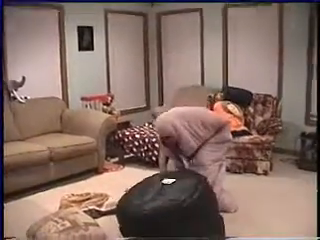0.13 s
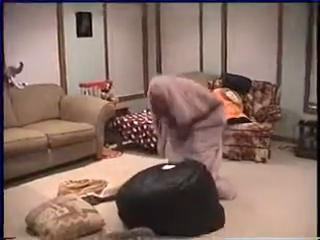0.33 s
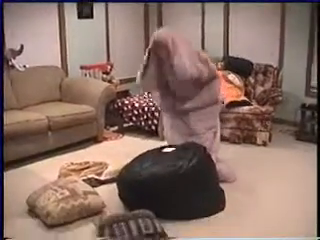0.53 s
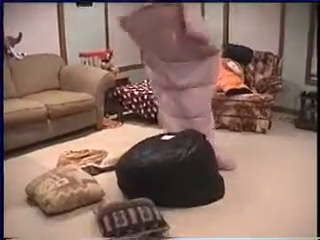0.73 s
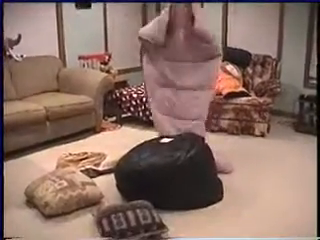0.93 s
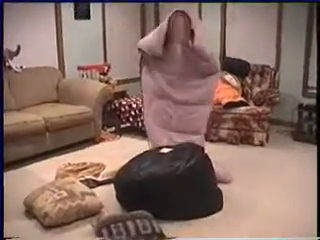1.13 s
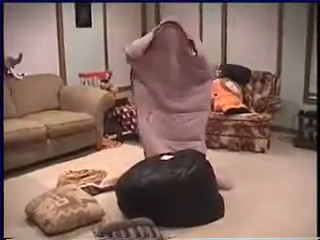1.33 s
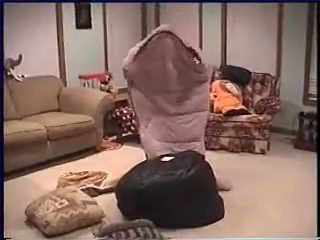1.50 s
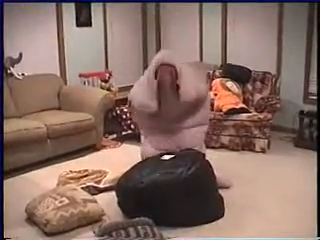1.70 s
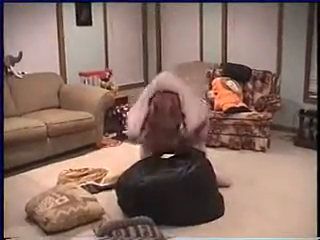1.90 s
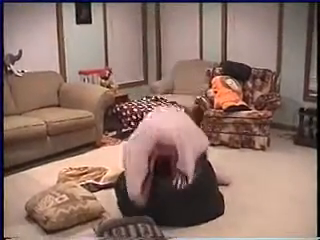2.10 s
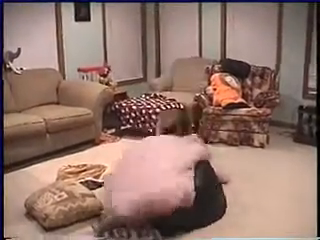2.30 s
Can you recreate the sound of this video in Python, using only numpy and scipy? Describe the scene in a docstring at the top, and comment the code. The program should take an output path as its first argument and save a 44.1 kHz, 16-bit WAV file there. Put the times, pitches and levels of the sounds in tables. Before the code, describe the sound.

A dull thump on a beanbag comes with a swish of sleeping bag fabric. Then a small plastic housing clicks sharply near the microphone, while quiet rustling and carpet shuffles continue over living room tone.

```python
"""Over room tone and a picture tube's faint whistle, a sleeping bag swishes with every move of its wearer.
After a shuffle on the living-room carpet they land against a beanbag (0.2 s): a soft thump, a brief boom.
From 0.5 s a small plastic housing close by clicks and creaks; two sharp clicks set a metal fitting pinging.
More swishes and shuffles follow as the wearer straightens and topples forward.
Only the left channel carries sound."""
import sys
import numpy as np
from scipy import signal
from scipy.io import wavfile

SR = 44100
rng = np.random.default_rng(int(sys.argv[2]) if len(sys.argv) > 2 else 0)


def dump(signal):
    """Clip the signal to [-1, 1] and save it as 16-bit WAV at the path in sys.argv[1]."""
    limited = np.clip(np.atleast_2d(signal).T, -1, 1)
    pcm = np.round(limited * 32767).astype(np.int16)
    wavfile.write(sys.argv[1], SR, pcm)


N = 103635
TIME_S = np.arange(N) / SR


def from_db(db):
    """Decibels to gain."""
    return 10 ** (np.asarray(db) / 20)


def unit_rms(x):
    """Scale to rms 1."""
    return x / np.sqrt(np.mean(x ** 2) + 1e-20)


def at_hz(points, hz):
    """Interpolate a table over log frequency."""
    points_hz, values = np.transpose(points)
    return np.interp(np.log(hz), np.log(points_hz), values)


def decay(age_s, t60_s):
    """Unity gain until age 0, then -60 dB per t60_s."""
    return np.exp(-np.log(1000) * np.maximum(age_s, 0) / t60_s)


def drift(rate_hz):
    """Low-passed random wander, rms 1."""
    pole = np.exp(-2 * np.pi * rate_hz / SR)
    return unit_rms(signal.lfilter([1], [1, -2 * pole, pole * pole], rng.standard_normal(2 * N))[N:])


def band_noise(spectrum, envelope=lambda hz: 1):
    """36-band noise following a spectrum; rms 1 before each band is scaled by envelope(hz)."""
    edges_hz = np.geomspace(20, 17000, 37)
    white = rng.standard_normal((2, N + SR // 4))
    out, power = 0, 0
    for k, (low_hz, high_hz) in enumerate(zip(edges_hz, edges_hz[1:])):
        bandpass = signal.butter(2, [low_hz, high_hz], "band", fs=SR, output="sos")
        band = signal.sosfilt(bandpass, white[k % 2])[-N:]
        hz = np.sqrt(low_hz * high_hz)
        gain = from_db(at_hz(spectrum, hz)) * np.sqrt(high_hz - low_hz)
        out += gain * unit_rms(band) * envelope(hz)
        power += gain ** 2
    return out / np.sqrt(power)


def ring(start_s, hz, t60_s):
    """One struck mode: a damped sine."""
    out = np.zeros(N)
    live = slice(int(start_s * SR) + 1, int((start_s + 2 * t60_s) * SR))
    age_s = TIME_S[live] - start_s
    out[live] = np.sin(2 * np.pi * hz * age_s) * decay(age_s, t60_s)
    return out


def reverb(x, t60_s):
    """Living room: a dull, decaying cloud of echoes."""
    age_s = TIME_S[:SR // 2]
    lowpass = signal.butter(1, 6000, fs=SR, output="sos")
    echoes = signal.sosfilt(lowpass, rng.standard_normal(len(age_s)))
    echoes *= decay(age_s, t60_s) * np.minimum(age_s / 0.0017, 1)
    return signal.fftconvolve(x, echoes / np.sqrt(np.sum(echoes ** 2)))[:N]


# Room tone and hiss: (frequency [Hz], density [dB])
ROOM_TONE_SPECTRUM = [(25, 0), (60, -2), (120, 0), (220, 1), (350, 1), (600, 3), (1000, 0), (1800, 0),
                      (3500, -4), (6000, -5), (9000, -5.5), (12000, -13.5), (15500, -20.5)]


def background(noise_db=-49, whistle_hz=15735, whistle_db=-73):
    """Steady room tone and hiss, plus a picture tube's line whistle."""
    whistle = from_db(whistle_db) * np.sin(2 * np.pi * whistle_hz * TIME_S)
    return from_db(noise_db) * band_noise(ROOM_TONE_SPECTRUM) + whistle


# Rubbing contour: (time [s], level [dB], treble sheen [dB])
CLOTH_MOVES = [(0, -47, 3.5), (0.17, -42.5, 2), (0.22, -37.5, 2), (0.29, -26.5, -1.5), (0.34, -35.5, -1.5),
               (0.409, -46, -0.5), (0.5, -47, -11), (0.58, -61, -5), (0.83, -62.5, 5), (0.97, -49.5, 2.5),
               (1.14, -44.5, 1), (1.35, -50.5, 1.5), (1.6, -48.5, 1.5), (1.87, -55, 2), (1.93, -50, 5),
               (2.03, -51, 7.5), (2.23, -55.5, 4), (2.35, -51.5, 5)]
# Swish: (frequency [Hz], density [dB])
CLOTH_SPECTRUM = [(100, -10), (300, -9), (700, -9), (1400, 0.5), (2600, 2.5), (5000, 0), (7000, -1),
                  (9000, 1), (11500, -7.5), (14000, -20.5), (16000, -16)]


def cloth(flicker_db=1, flicker_hz=7.7, grain_db=1, grain_hz=320, sheen_ramp_hz=(3500, 8000)):
    """The sleeping bag slides over itself: a fine-grained swish with varying sheen."""
    times_s, levels_db, sheens_db = np.transpose(CLOTH_MOVES)
    level_db = np.interp(TIME_S, times_s, levels_db)
    sheen_db = np.interp(TIME_S, times_s, sheens_db)

    def band_gain(hz):
        treble_share = np.interp(hz, sheen_ramp_hz, (0, 1))
        return from_db(flicker_db * drift(flicker_hz) + treble_share * sheen_db)
    swish = band_noise(CLOTH_SPECTRUM, band_gain)
    return from_db(level_db + grain_db * drift(grain_hz)) * swish


# Feet and padding: (peak time [s], level [dB], Gaussian sigma [s])
SHUFFLE_SWELLS = [(0.129, -48, 0.083), (0.485, -40.5, 0.036), (1.196, -49.5, 0.08), (1.419, -47.5, 0.026),
                  (1.513, -52.5, 0.036), (1.578, -46, 0.0095), (1.626, -46.5, 0.009), (2.138, -48, 0.0087),
                  (2.236, -51, 0.0091), (2.355, -53, 0.025)]
# Dull scuff: (frequency [Hz], density [dB])
SHUFFLE_SPECTRUM = [(70, -32.5), (200, -0.5), (360, -0.5), (650, -1.5), (1100, -6), (2000, -30.5),
                    (5000, -49)]


def shuffles():
    """Weight shifts on the carpet in dull swells."""
    swells = sum(from_db(db) * np.exp(-0.5 * ((TIME_S - peak_s) / sigma_s) ** 2)
                 for peak_s, db, sigma_s in SHUFFLE_SWELLS)
    return band_noise(SHUFFLE_SPECTRUM) * swells


# Soft blows of the landing: (time [s], level [dB], attack [s], extra bass [dB])
LANDING_BLOWS = [(0.207, -35, 0.0085, -0.5), (0.225, -21, 0.0042, 1), (0.253, -20.5, 0.0059, 3),
                 (0.27, -16, .004, 3.5), (0.3, -26, 0.0022, 13.5)]
# Padding crush: (frequency [Hz], density [dB])
CRUSH_SPECTRUM = [(25, -18), (60, -17.5), (105, -15), (160, -4.5), (250, -2), (420, 0), (650, -4.5),
                  (1050, -10.5), (1500, -18.5), (2500, -17), (5000, -55)]
# Crush decay: (frequency [Hz], t60 [s])
CRUSH_DECAY = [(50, 0.47), (130, 0.11), (270, 0.34), (550, 0.32), (1100, 0.35), (3000, 0.18)]
# Floor and room modes: (frequency [Hz], level [dB], t60 [s])
BOOM_MODES = [(150.5, -13, 0.19), (183.6, -27, 0.49), (212, -23, 0.52), (240.7, -8, 0.318),
              (272.8, -10.5, .38), (338.7, -18, .25), (375.5, -9, 0.21), (426.7, -5.5, 0.12),
              (498, -11.5, 0.24), (550, -10, 0.33), (611, -13, 0.34), (709, -11.5, 0.2), (737, -15.5, 0.15),
              (841, -29, 0.3), (947, -18, 0.13), (1005, -13.5, 0.13), (1125, -20, 0.11)]


def thump(boom_gain_db=3, bass_ramp_hz=(250, 500)):
    """Each blow crushes the padding and drives floor and room modes, which decay at their own rates."""
    def envelope(hz, t60_s):
        bass_share = np.interp(hz, bass_ramp_hz, (1, 0))
        power = 0
        for start_s, db, attack_s, bass_db in LANDING_BLOWS:
            age_s = TIME_S - start_s
            blow = np.clip(age_s / attack_s, 0, 1) * decay(age_s - attack_s, t60_s)
            power += (from_db(db + bass_share * bass_db) * blow) ** 2
        return np.sqrt(power)
    crush = band_noise(CRUSH_SPECTRUM, lambda hz: envelope(hz, at_hz(CRUSH_DECAY, hz)))
    boom = sum(from_db(db) * np.sin(2 * np.pi * hz * TIME_S) * envelope(hz, t60_s)
               for hz, db, t60_s in BOOM_MODES)
    return crush + from_db(boom_gain_db) * boom


# Plastic slips: (time [s], ring level [dB], low EQ [dB], nasal EQ [dB], top EQ [dB],
# crack level [dB], crack hold [s], reverb send [dB])
HOUSING_SLIPS = [(0.481, -38, 1, 10.5, 2, -32, 0.0034, -11.5),
                 (0.6404, -21.5, -4, -2, -4, -26.5, 0.0037, -24),
                 (0.7530, -19.5, -1.5, -4, 8.5, -32.5, 0.0029, -31),
                 (1.107, -40.5, 1, 10.5, -4, -45, 0.0037, -14),
                 (1.1412, -29, -13, -9, -12, -24, 0.0028, -7.5), (1.1455, -25, 2, 1.5, -15, -43, .003, -20),
                 (1.341, -46, 2, -13, -6, -65, .003, -17), (1.570, -46, 11.5, -11, -6, -63, .003, -8.5),
                 (1.609, -38, 5, 9.5, -14, -66, 0.0019, -12),
                 (2.211, -44.5, 2, -13, -11, -58, 0.0028, -2.5)]
# Housing resonances: (frequency [Hz], level [dB], t60 [s])
HOUSING_MODES = [(295, -15.5, 0.06), (549, -5, 0.083), (727, -5, 0.029), (940, -13.5, 0.093),
                 (1041, -4.5, 0.031), (1152, 3, 0.044), (1387, -8.5, 0.071), (1526, -12, .05),
                 (1689, -6.5, 0.053), (1764, -13, 0.056), (1953, -7.5, 0.035), (2148, -12, .04),
                 (2585, -19, 0.031), (2885, -24, 0.038), (3370, -28, 0.046)]
# Crack grit: (frequency [Hz], density [dB])
CRACK_SPECTRUM = [(200, 3), (600, -1.5), (1100, 8.5), (2100, 2.5), (3100, 3.5), (3700, 1.5), (4300, -4),
                  (5300, 3.5), (6300, -3), (7400, -2), (8500, -25), (11000, -7.5), (14000, -26)]


def housing_clicks(crack_t60_s=0.0046, tail_db=-12, tail_t60_s=0.082, low_cut_hz=216):
    """Each slip of the plastic cracks and rings the housing, which is too small to radiate bass."""
    grit = band_noise(CRACK_SPECTRUM)
    direct, send = 0, 0
    for start_s, ring_db, low_db, nasal_db, top_db, crack_db, hold_s, send_db in HOUSING_SLIPS:
        eq = [(600, low_db), (1150, 0), (1700, nasal_db), (2900, top_db)]
        modes = sum((-1) ** k * from_db(ring_db + mode_db + at_hz(eq, hz)) * ring(start_s, hz, t60_s)
                    for k, (hz, mode_db, t60_s) in enumerate(HOUSING_MODES))
        age_s = TIME_S - start_s
        snap = decay(age_s - hold_s, crack_t60_s)
        tail = from_db(tail_db) * decay(age_s - hold_s, tail_t60_s)
        crack = from_db(crack_db) * (age_s > 0) * (snap + tail) * grit
        click = modes + crack
        direct += click
        send += from_db(send_db) * click
    highpass = signal.butter(3, low_cut_hz, "high", fs=SR, output="sos")
    return signal.sosfilt(highpass, direct + reverb(send, t60_s=0.16))


# Jolts to the fitting: (time [s], level [dB])
METAL_JOLTS = [(0.6405, -33.5), (1.1418, -40)]
# Fitting resonances: (frequency [Hz], level [dB], t60 [s])
METAL_MODES = [(5355, -8, .035), (7190, -4, .035), (7420, 0, .045)]


def metal_pings(reverb_db=-6):
    """A small metal fitting, jogged at two sharp clicks, rings and leaves a shimmer in the room."""
    direct = sum(from_db(db + mode_db) * ring(start_s, hz, t60_s)
                 for start_s, db in METAL_JOLTS for hz, mode_db, t60_s in METAL_MODES)
    return direct + from_db(reverb_db) * reverb(direct, t60_s=0.42)


def scene():
    """All sources left; right silent."""
    left = background() + cloth() + shuffles() + thump() + housing_clicks() + metal_pings()
    return np.array([left, np.zeros(N)])


def record(dry):
    """Steep low-pass at 16 kHz."""
    return signal.sosfilt(signal.ellip(12, 0.1, 90, 16000, fs=SR, output="sos"), dry)


dry = scene()
out = record(dry)
dump(out)
```